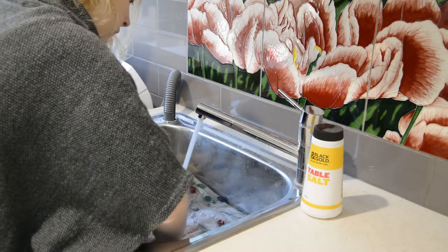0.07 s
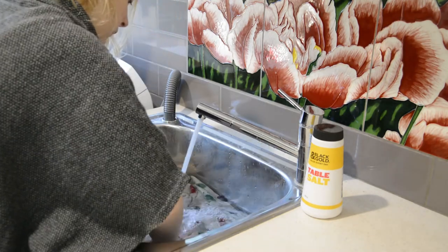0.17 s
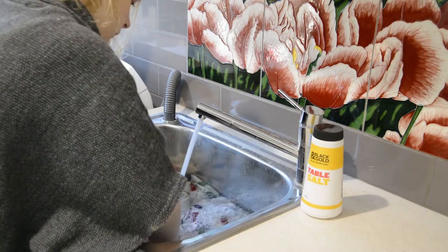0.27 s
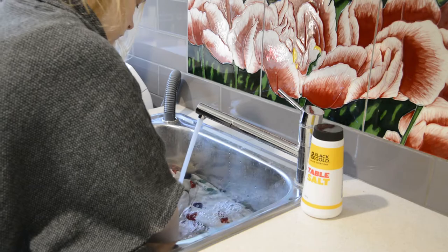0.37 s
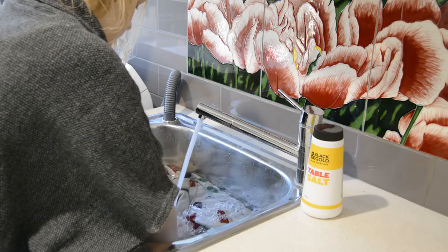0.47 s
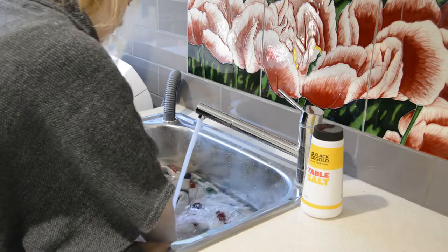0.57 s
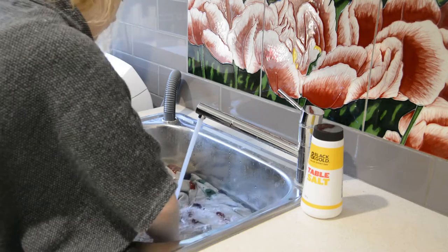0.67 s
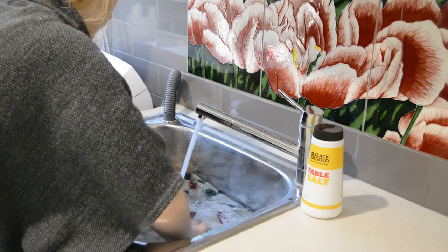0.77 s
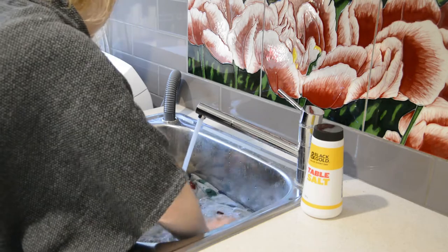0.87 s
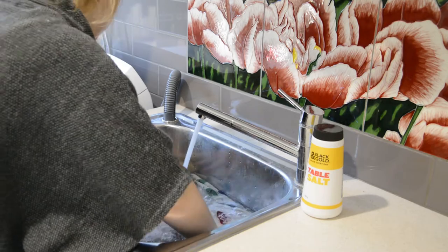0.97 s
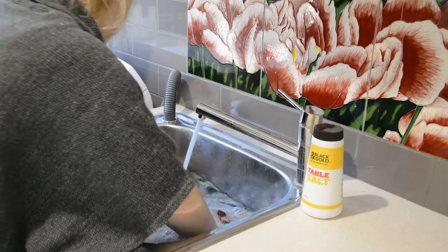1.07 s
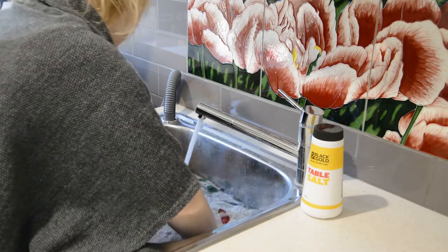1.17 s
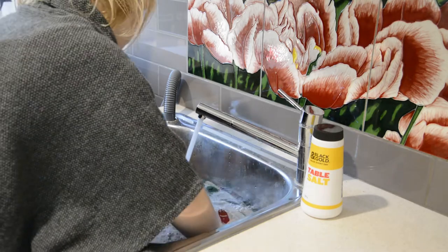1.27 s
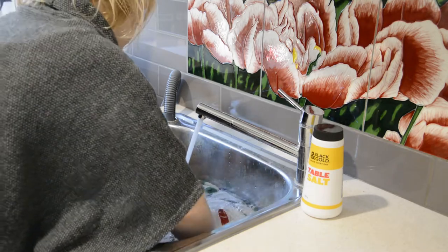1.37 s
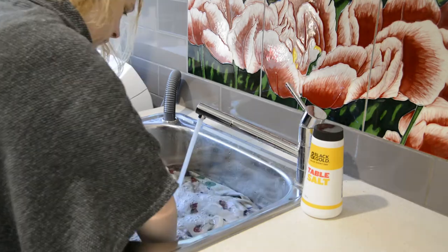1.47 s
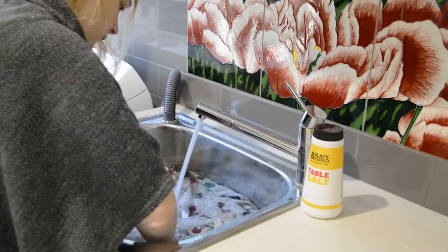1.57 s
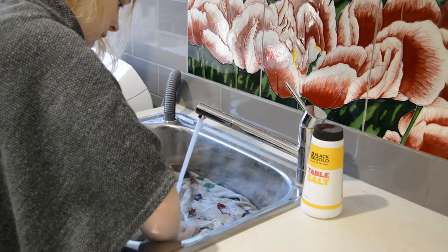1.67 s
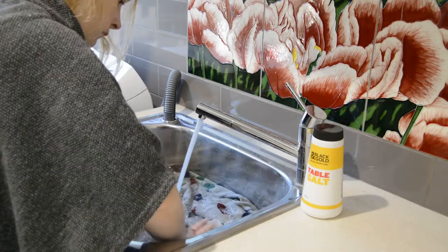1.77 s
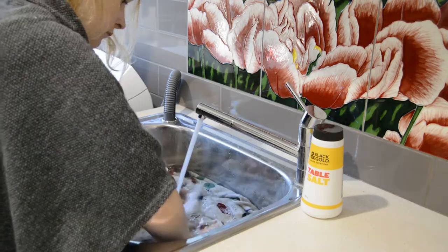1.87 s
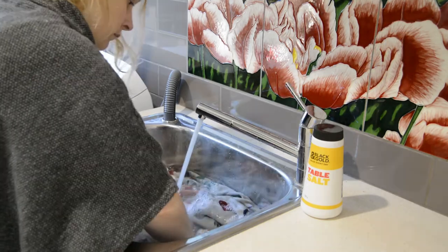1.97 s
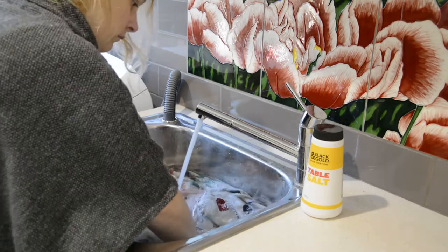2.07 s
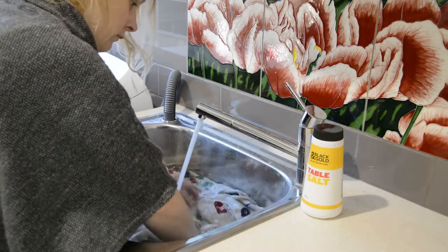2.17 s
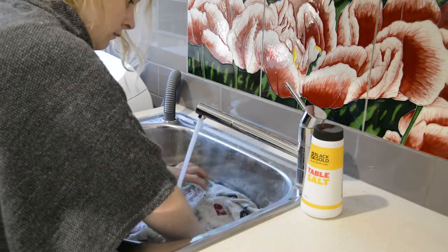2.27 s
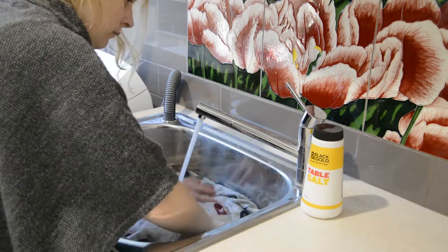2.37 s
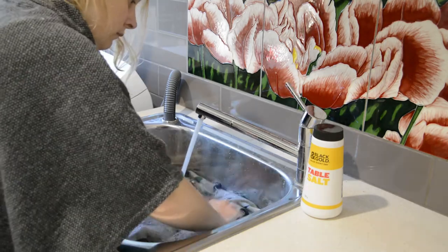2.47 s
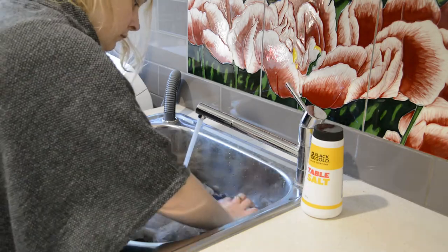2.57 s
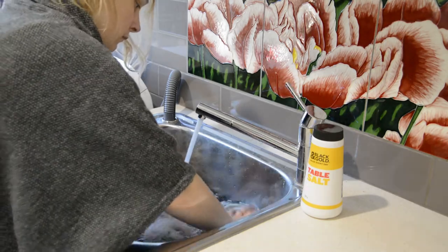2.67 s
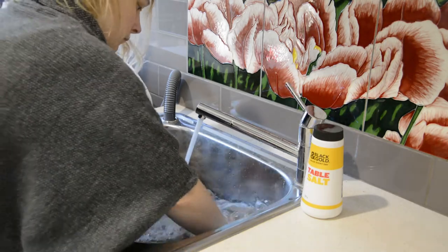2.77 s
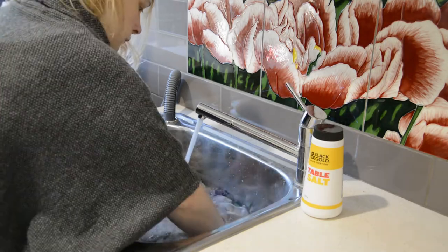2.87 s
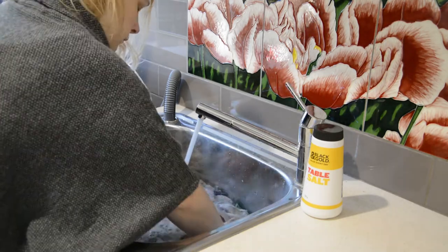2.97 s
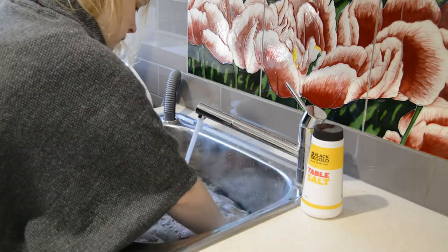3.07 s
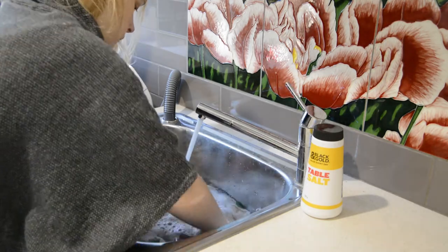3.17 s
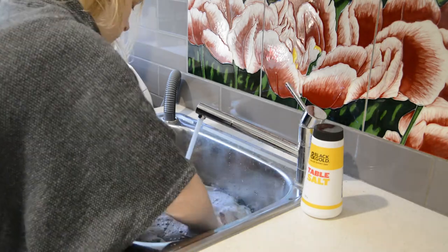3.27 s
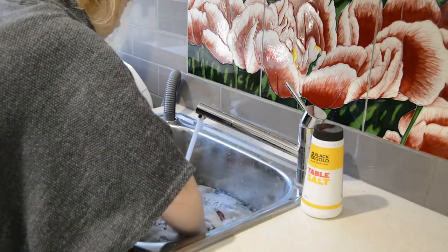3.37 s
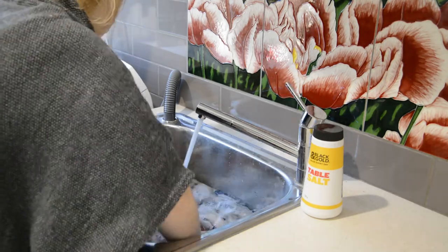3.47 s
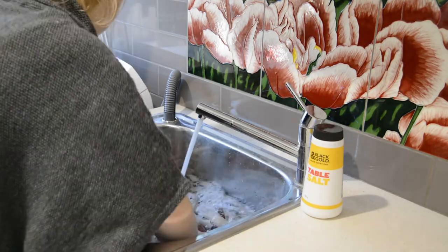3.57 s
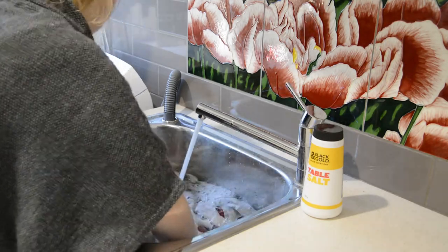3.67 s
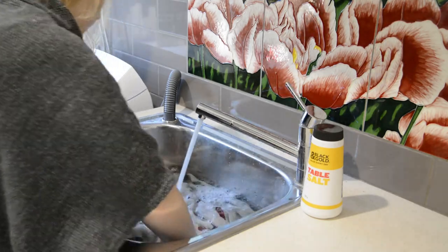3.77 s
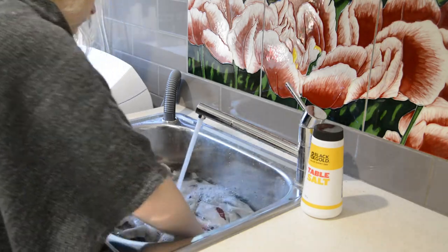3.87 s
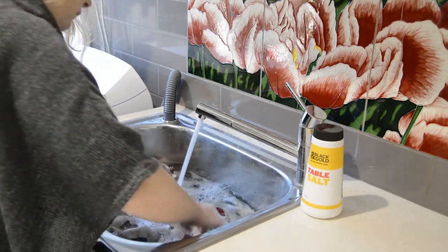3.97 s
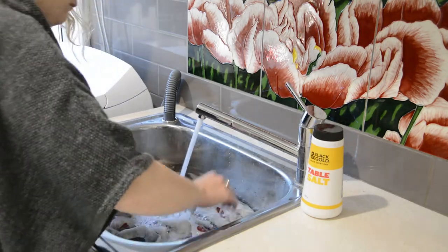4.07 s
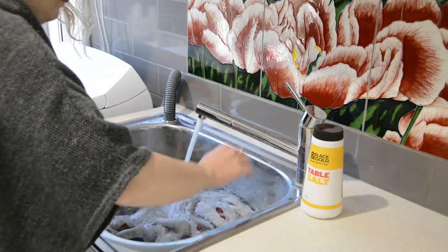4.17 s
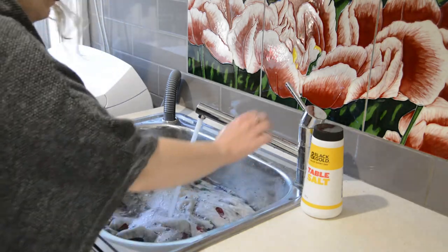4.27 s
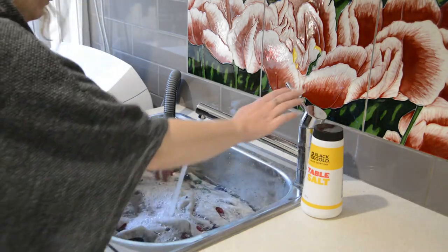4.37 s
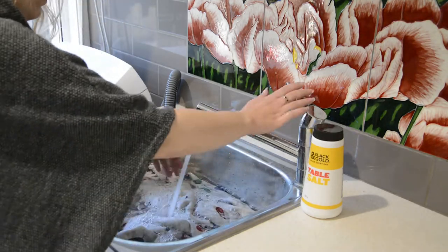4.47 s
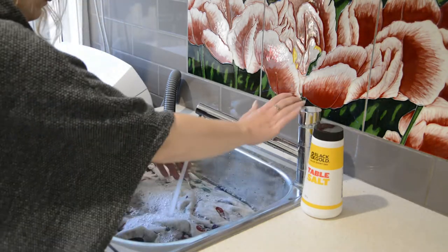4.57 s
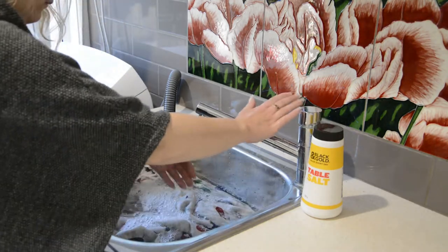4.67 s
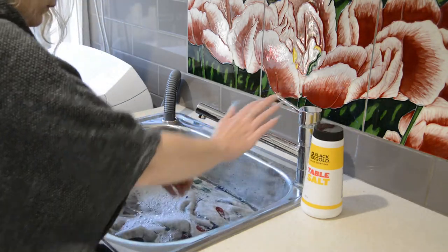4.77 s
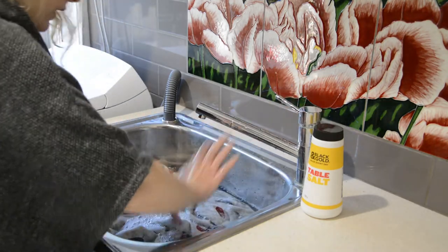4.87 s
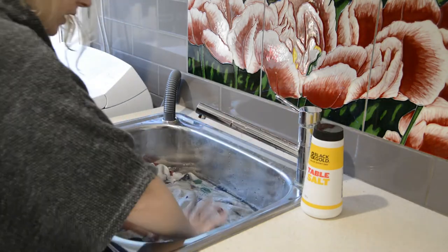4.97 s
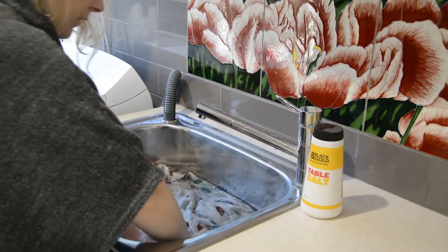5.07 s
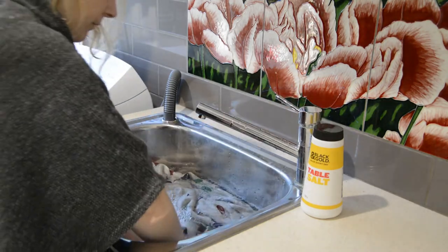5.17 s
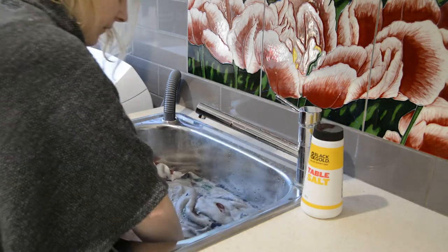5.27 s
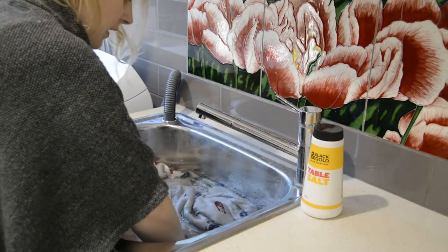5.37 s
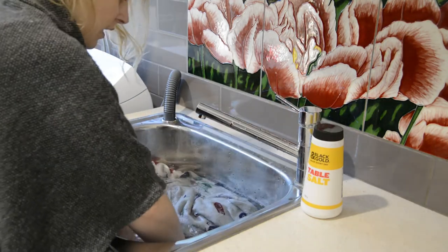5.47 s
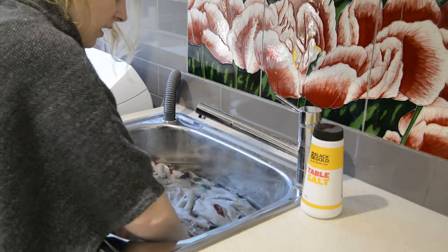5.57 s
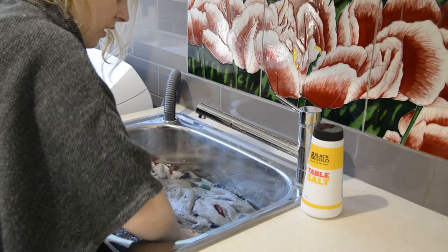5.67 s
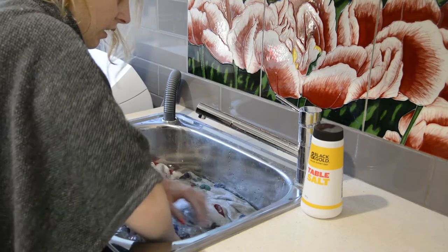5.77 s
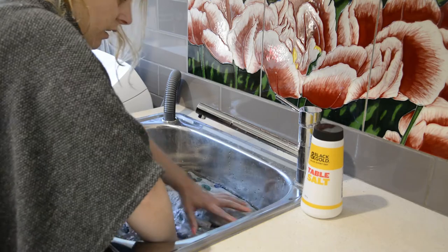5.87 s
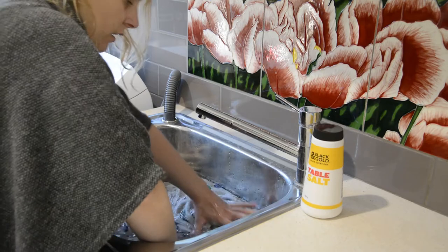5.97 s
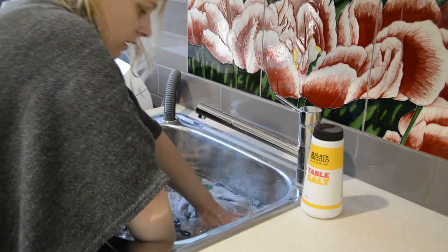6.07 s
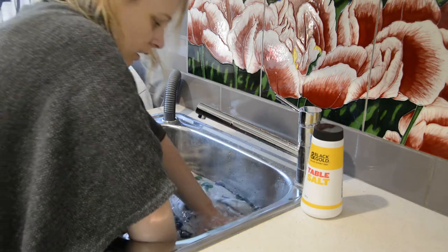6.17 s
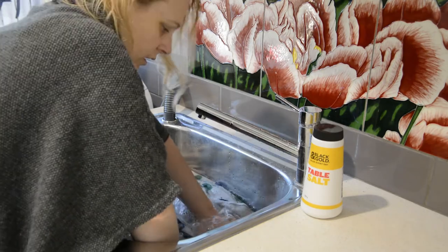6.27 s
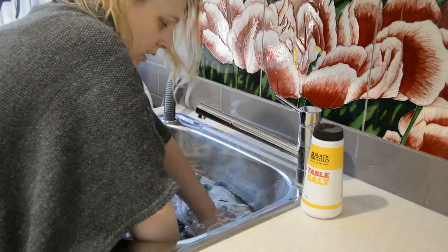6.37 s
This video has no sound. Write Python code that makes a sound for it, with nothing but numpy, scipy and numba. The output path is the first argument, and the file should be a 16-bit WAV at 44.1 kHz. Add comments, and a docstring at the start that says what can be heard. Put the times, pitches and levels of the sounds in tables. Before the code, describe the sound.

A bright, bubbling jet hits wet fabric in a metal basin with splashes; a dull shut-off, then small plops and squelches over faint fizzing foam.

```python
"""An aerated tap jet patters on cloth soaking in a steel sink: dense random clicks over a fine spray of noise.
It churns up ringing bubbles and drums the basin, as noise through resonances. Hands knead the cloth:
air gurgles out as strings of bubbles and water splashes in bursts of droplets. The lever is shut with a thud
and a jolt of low modes in the pipe; the kneading goes on over fizzing foam, in a small tiled kitchen."""
import sys
import numpy as np
from scipy import signal
from scipy.fft import rfft, irfft
from scipy.io import wavfile
from scipy.ndimage import uniform_filter1d
from numba import njit

SR = 44100
rng = np.random.default_rng(int(sys.argv[2]) if len(sys.argv) > 2 else 0)


def generate_wav(sig):
    """Save sig (samples, or channels by samples) to the path in sys.argv[1] as 16-bit PCM at SR."""
    pcm = np.round(np.clip(np.atleast_2d(sig).T, -1, 1) * 32767).astype(np.int16)
    wavfile.write(sys.argv[1], SR, pcm)


N = 284004
T = np.arange(N) / SR
# frequencies of a transform padded to twice the length
HZ = np.maximum(np.arange(N + 1) * SR / (2 * N), 1)


def undb(db):
    """Logarithmic level: decibels become an amplitude gain."""
    return 10 ** (np.asarray(db) / 20)


def unit(x):
    """Normalization by mean power: scale to rms 1."""
    return x / np.sqrt(np.mean(x ** 2))


def curve(rows):
    """Linear interpolation of (seconds, value) rows at every sample."""
    return np.interp(T, *np.transpose(rows))


def filtered(x, response):
    """Linear filtering: the spectrum is multiplied by a frequency response."""
    return irfft(rfft(x, 2 * N) * response)[..., :N]


def colour(points):
    """Spectral envelope: a response through (Hz, dB) points, straight over log frequency."""
    hz, db = np.transpose(points)
    return undb(np.interp(np.log(HZ), np.log(hz), db))


def resonances(modes):
    """Modal superposition: (Hz, width Hz, dB) resonators side by side."""
    return sum(undb(db) / (1 + 1j * (HZ ** 2 - hz ** 2) / (HZ * width)) for hz, width, db in modes)


def walk(rate):
    """Slow random modulation: levels drawn `rate` times a second and slewed, with a spread of about 0.84."""
    hold = int(SR / rate)
    steps = np.repeat(rng.standard_normal(N // hold + 1), hold)
    return 1.03 * uniform_filter1d(steps, hold)[:N]


def patter(rate, spread_db):
    """Random impulses: very many small droplet clicks and a few big ones, up to a largest drop."""
    size = undb(spread_db * np.minimum(rng.exponential(size=N), 4.7))
    struck = rng.random(N) < rate / SR
    return unit(struck * rng.choice([-1, 1], N) * size)


@njit
def bubbles(start, hz, ring_s, size, glide):
    """Bubble resonance: each swells within a cycle, decays 60 dB in ring_s and rises by the share glide."""
    out = np.zeros(N)
    for k in range(len(start)):
        first, life = int(start[k] * SR), int(ring_s[k] * SR) + 1
        turn = 2 * np.pi * hz[k] / SR
        phasor = size[k] + 0j
        step = np.exp(1j * turn - 6.9 / life)
        bend = np.exp(1j * turn * glide / life)
        for i in range(max(first, 0), min(first + life, N)):
            phasor *= step
            step *= bend
            out[i] += phasor.imag * min((i - first) * hz[k] / SR, 1.)
    return out


def burst(s, rise, fall):
    """Transient envelope: a rounded swell up to time s, then an exponential fall."""
    return np.exp(-np.minimum(np.where(T < s, ((T - s) / rise) ** 2, (T - s) / fall), 20))


# Each row: frequency in Hz, spectral level in dB per Hz, of the faint noise of each microphone.
HISS_SPECTRUM = [(50, -17), (200, -11), (600, 7.5), (1500, -4), (4000, 2), (16000, -10)]


def hiss():
    """Stationary noise: the faint, coloured hiss of one microphone."""
    return unit(filtered(rng.standard_normal(N), colour(HISS_SPECTRUM))) * undb(-60.5)


def kitchen(x, t60_s, wet_db, count):
    """Reverberation: tiles and worktop return dense tails, whose paths shift as the body moves over the sink."""
    t = T[:SR // 2]
    walls = filtered(x, colour([(200, 2.5), (900, 2.5), (4000, -1), (8000, 1.5), (15000, 1.0)]))
    shares = np.array([walk(3.5) for _ in range(count)])
    shares /= np.sqrt(np.sum(shares ** 2, axis=0))
    echo = 0
    for share in shares:
        # no reflection in the first 2 ms
        tail = rng.standard_normal(len(t)) * undb(-60 * t / t60_s) * (t > .002)
        echo = echo + signal.fftconvolve(walls * share, tail / np.sqrt(np.sum(tail ** 2)))[:N]
    return (x + undb(wet_db) * echo) / np.sqrt(1 + undb(2 * wet_db))


# Quiet kitchen with foam fizzing in the sink. Each row: frequency in Hz, spectral level in dB per Hz.
FOAM_SPECTRUM = [(30, -15), (60, -3), (85, -8), (112, 1.5), (160, -4), (300, 3), (750, 4.5), (1200, 5),
                 (1550, 4.5), (2050, 7), (2500, 1.5), (3000, 4.5), (4200, 3), (5100, 1.5), (6200, -1),
                 (7500, -0.5), (11000, -4.5), (16000, -3.5)]
# The fizzing foam settles once the hands rest. Each row: time in seconds, level in dB.
FOAM_LEVEL = [(4.8, -51.5), (5.25, -50.5), (5.6, -52.5), (5.95, -49.5), (6.2, -51), (6.4, -52.5)]
# Water seeping past the plug sings faintly.
# Each row: frequency in Hz, width in Hz of each of two resonators in series, gain in dB of each.
SEEP_RESONATORS = [(730, 72, -3), (2050, 300, -1), (3980, 160, -9)]
SEEP_DB = -60.5


def foam():
    """Random bursting: tiny bubbles click over the hush of the kitchen, and seeping water excites narrow bands."""
    fizz = rng.standard_normal(N) + undb(-1.5) * patter(rate=1100, spread_db=1.5)
    fizz = unit(filtered(fizz, colour(FOAM_SPECTRUM))) * undb(curve(FOAM_LEVEL) + 0.53 * walk(14))
    bands = sum(resonances([mode]) ** 2 for mode in SEEP_RESONATORS)
    seep = unit(filtered(rng.standard_normal(N), bands))
    return fizz + undb(SEEP_DB) * seep


# Modes of the pipe and the worktop. Each row: frequency in Hz, width in Hz, gain in dB.
PIPE_MODES = [(64.5, 20, -2), (118, 38, -2), (180, 48, -2), (299, 35, -7.5), (474, 690, -15),
              (710, 75, -16)]
# Dull thuds, of the lever and the closing valve, then of hands on the sink.
# Each row: peak time in seconds, level in dB, fall to 1/e in seconds.
THUD_BLOWS = [(4.55, -57, 0.033), (4.637, -37, 0.019), (4.673, -37.5, 0.034), (4.79, -48.5, 0.21),
              (5.08, -49.5, 0.065), (5.18, -57, 0.15), (5.495, -53, 0.016)]


def thuds():
    """Forced vibration: padded blows shake the modes of the pipe and the worktop."""
    tilt = colour([(25, -12), (50, -17.0), (800, 5), (2500, 7.0)])
    rumble = filtered(rng.standard_normal(N), resonances(PIPE_MODES) * tilt)
    # the blow alone sets the strength of the shaking
    rumble /= np.sqrt(uniform_filter1d(rumble ** 2, size=2500))
    return rumble * sum(undb(db) * burst(s, 0.033, fall) for s, db, fall in THUD_BLOWS)


# The lever meets its stop and the halted water jolts the plumbing; tap, pipe and sink ring in turn.
# Each row: start in seconds, peak level in dB, frequency in Hz, ring to -60 dB in seconds.
JOLT_MODES = [(4.627, -36, 650, 0.13), (4.626, -35.5, 176, 0.13), (4.643, -36.5, 117, 0.34),
              (4.645, -46, 63, .36), (4.66, -38, 318, 0.22)]


def jolt():
    """Free decay: shutting the valve sets off a few low modes; each swells within a cycle and rings out."""
    out = np.zeros(N)
    for s, db, hz, ring_s in JOLT_MODES:
        age = np.clip(T - s, 0, 2 * ring_s)
        swell = np.minimum(age * hz, 1)
        decay = np.exp(-np.log(1000) * age / ring_s)
        out += undb(db) * swell * decay * np.sin(2 * np.pi * hz * age)
    return out


# Water thrown up, or pressed and sucked through the cloth. Each row: peak time in seconds, level in dB,
# rise from 1/e in seconds, fall to 1/e in seconds, centre frequency in Hz.
SPLASH_BURSTS = [(.19, -29, 0.051, 0.049, 8040), (.3, -27.5, 0.063, 0.12, 7400),
                 (.99, -45, 0.023, 0.023, 560), (1.51, -44, .025, 0.071, 560),
                 (2.06, -26.5, 0.041, .04, 6940), (2.35, -35, 0.042, .1, 7000),
                 (2.5, -31.5, 0.067, .08, 2000), (2.662, -33, .008, .022, 2400),
                 (2.78, -24, 0.019, 0.032, 4300), (4.79, -52.5, .06, 0.073, 1300),
                 (4.98, -49, 0.048, 0.099, 7500), (5.08, -36.5, 0.041, 0.057, 2470),
                 (5.119, -36, .004, 0.01, 11000), (5.15, -36, 0.02, 0.027, 8000),
                 (5.186, -38.5, 0.005, 0.0067, 8040), (5.367, -45, .016, 0.03, 6600),
                 (5.467, -48, 0.029, .035, 4870), (5.536, -50, 0.003, 0.03, 2200),
                 (5.661, -45, .003, .02, 4200), (5.72, -44.5, 0.029, 0.079, 3300),
                 (5.785, -42, .018, 0.041, 6260), (5.793, -34, 0.0058, 0.0078, 12000),
                 (5.84, -50, 0.026, .09, 10900), (5.796, -35, 0.0045, 0.063, 2300),
                 (5.935, -43.5, 0.037, 0.082, 3200), (6.005, -46, 0.027, .03, 12500),
                 (6.05, -46, 0.035, 0.034, 1105), (6.059, -31.5, 0.026, 0.032, 3700),
                 (6.064, -38.5, 0.018, 0.024, 10800), (6.17, -56, .08, 0.12, 3300),
                 (6.44, -45, 0.0075, .008, 2330)]


def splashes(count=7000):
    """Band-limited bursts: ticking droplets and tiny ringing bubbles, each splash about its own centre."""
    when, pitch, size = rng.random((count, 3)).T
    pitch_hz = 900 * 14 ** pitch
    strength = undb(-3.5 * np.log(size + 0.043)) * pitch_hz
    fizz = bubbles(when * N / SR, pitch_hz, 20 / pitch_hz, strength, 0.11)
    drops = patter(rate=3700, spread_db=1.0) + undb(-7.5) * unit(fizz)
    # unpadded transform: every second frequency
    hz_grid = HZ[::2]
    spectrum = rfft(drops) * colour([(150, -26), (700, 10.0), (16000, -2.0)])[::2]
    out = np.zeros(N)
    for s, db, rise, fall, hz in SPLASH_BURSTS:
        band = 1 / (1 + 1j * (hz_grid / hz - hz / hz_grid) / 1.74) ** 2
        out += undb(db) * burst(s, rise, fall) * unit(irfft(spectrum * band))
    return out


# bubbles of one pocket climb in pitch as it empties
CLIMB_OCTAVES_PER_S = 4.14
# a bubble rings for a set number of cycles, but no longer than the cloth lets it, before random scatter
RING_CYCLES, RING_MAX_S = 73, 0.098


def gurgle(s, db, hz, length, scatter, count=20):
    """Bubble formation: a pocket of air breaks into a string of bubbles, the later ones higher and weaker."""
    when = (np.arange(count) + rng.random(count)) / count
    pitch, size, life = rng.standard_normal((3, count))
    octaves = scatter * pitch + CLIMB_OCTAVES_PER_S * length * (when - .5)
    ring_s = min(RING_CYCLES / hz, RING_MAX_S) * np.exp(0.37 * life)
    strength = undb(1.1 * size - 2.0 * np.abs(pitch) - 4.6 * when)
    string = bubbles(s + length * (when - when[0]), hz * 2 ** octaves, ring_s, strength, 0.1)
    return undb(db) * string / np.sqrt(np.sum(string ** 2) / ((length + 0.016) * SR))


# Pockets of air squeezed out of the cloth. Each row: start in seconds, level in dB, bubble pitch in Hz,
# length in seconds, scatter of pitch in octaves.
AIR_POCKETS = [(0.022, -40, 1400, 0.089, 0.13), (0.657, -42.5, 885, 0.053, 0.14),
               (0.713, -45.5, 1016, 0.047, 0.12), (0.681, -48.5, 227, .08, 0.11),
               (0.768, -34.5, 1159, 0.041, 0.11), (0.805, -37, 1380, 0.039, 0.092),
               (0.823, -38.5, 1960, 0.033, 0.051), (0.933, -45.5, 276, 0.059, 0.12),
               (0.98, -36, 1600, 0.029, 0.15), (1.07, -35, 3640, .035, 0.19),
               (1.121, -46, 250, .038, 0.097), (1.283, -46.5, 263, 0.062, 0.14),
               (1.423, -36, 1470, 0.016, 0.47), (1.69, -41, 916, 0.045, 0.085),
               (1.738, -37, 1133, 0.05, 0.12), (1.771, -39, 1322, 0.03, 0.14),
               (1.897, -36, 4100, 0.035, 0.21), (2.122, -32.5, 2010, .03, 0.26),
               (2.158, -50, 240, .05, 0.14), (2.359, -35.5, 962, .07, 0.19), (2.433, -36, 1510, .028, 0.18),
               (2.451, -40, 924, .065, 0.17), (2.508, -37, 1714, 0.062, 0.28),
               (2.651, -31.5, 1960, .028, 0.3), (2.756, -40, 945, .02, .12),
               (3.666, -37.5, 2220, .07, 0.16), (4.96, -49.5, 3260, 0.037, 0.18),
               (4.998, -48, 1920, 0.048, 0.2), (5.04, -48, 950, .06, .24), (5.059, -40.5, 1754, .045, 0.2),
               (5.166, -48, 2750, 0.023, .12), (5.228, -52, 2080, .03, 0.11),
               (5.294, -49, 1110, 0.039, 0.15), (5.345, -37.5, 1298, .014, 0.37),
               (5.367, -43, 1650, 0.017, 0.25), (5.391, -48, 1020, .014, 0.137),
               (5.407, -52, 1580, 0.036, 0.4), (5.459, -46.5, 2390, 0.025, .24),
               (5.465, -50.5, 5100, .025, .12), (5.524, -48.5, 3870, 0.044, 0.14),
               (5.534, -46.5, 1413, .015, 0.21), (5.657, -41.5, 3590, 0.022, 0.16),
               (5.66, -50, 1390, .012, 0.15), (5.703, -41, 1530, 0.03, .2), (5.729, -46, 3190, .02, 0.14),
               (5.769, -44, 1400, .01, 0.32), (5.79, -40.5, 2500, .018, 0.059),
               (5.789, -37.5, 1020, .02, 0.15), (5.792, -45.5, 4750, 0.027, 0.11),
               (5.826, -44, 1450, .04, .34), (5.859, -50, 1100, .03, 0.3),
               (5.904, -41.5, 1780, 0.053, 0.22), (5.982, -48, 1270, 0.024, 0.38)]
# small pockets of air that the jet frees by chance
STRAY_DB, STRAY_LENGTH_S = -39, .04
STRAY_LOW_HZ, STRAY_OCTAVES, STRAY_SCATTER_OCTAVES = 1400, 1.6, .2


def gurgles(count=12):
    """Displacement of air by water: hands squeeze out big pockets; the running jet frees small ones at random."""
    pockets = list(AIR_POCKETS)
    for when, pitch in rng.random((count, 2)):
        hz = STRAY_LOW_HZ * 2 ** (STRAY_OCTAVES * pitch)
        pockets.append((when * SHUT_S, STRAY_DB, hz, STRAY_LENGTH_S, STRAY_SCATTER_OCTAVES))
    return filtered(sum(gurgle(*row) for row in pockets), colour([(60, -31), (190, -0.5)]))


# Lone large bubbles that ring on in calm water.
# Each row: start in seconds, peak level in dB, starting pitch in Hz, ring to -60 dB in seconds.
LONE_BUBBLES = [(4.849, -42, 196, .13), (5.037, -33, 1800, .11), (5.06, -30, 1825, .09),
                (5.038, -40, 817, .08), (5.064, -41, 775, .09), (5.118, -39, 790, .1),
                (5.142, -38, 766, 0.11), (5.346, -31, 940, 0.028), (5.35, -30, 1470, .035),
                (5.361, -31, 1430, .02), (5.366, -30, 1036, 0.075), (5.378, -25.5, 1074, 0.038),
                (5.388, -38, 765, .08), (5.539, -40, 1355, .08), (5.558, -38, 1290, 0.069),
                (5.598, -48, 1300, .06), (5.706, -34, 1410, .03), (5.717, -35, 1530, .04),
                (5.79, -26, 866, .08), (5.793, -30, 1380, .04), (5.804, -28, 926, 0.065),
                (5.813, -31, 826, 0.09), (5.905, -33, 1520, .03), (5.925, -36, 1610, .05)]


def plops():
    """Volume resonance of single large bubbles: each is one clear, slightly rising note."""
    s, db, hz, ring_s = np.array(LONE_BUBBLES, float).T.copy()
    return bubbles(s, hz, ring_s, undb(db), 0.04)


# the valve closes; the water left in the spout trickles on for a moment
SHUT_S, CLOSE_DB_PER_S = 4.608, 320
TRICKLE_DB, TRICKLE_S, DRAIN_DB_PER_S = -13.5, 0.12, 232
# the jet first glances off a fold, then strikes the cloth squarely and patters louder
GLANCING_DB, SQUARE_S = -2.5, 1.472


def flow():
    """Throttling: the share of the full flow that passes the closing valve."""
    return undb(-CLOSE_DB_PER_S * np.maximum(T - SHUT_S, 0))


def landing():
    """Impact strength: the jet lands glancing at first, and at last trickles from the emptying spout."""
    trickle = undb(TRICKLE_DB - DRAIN_DB_PER_S * np.maximum(T - SHUT_S - TRICKLE_S, 0))
    return np.maximum(flow(), trickle) * undb(GLANCING_DB * (T < SQUARE_S))


# Singing bands of the aerator.
# Each row: frequency in Hz, width in Hz of each of two resonators in series, gain in dB of each.
AERATOR_RESONATORS = [(3100, 280, 2.5), (4960, 420, -2)]
# the aerator sings faintly, most while the jet runs undisturbed
AERATOR_DB, AERATOR_SWELL_DB, AERATOR_PEAK_S, AERATOR_SWELL_S = -44, 7, 3.18, 0.32


def aerator():
    """Flow-excited resonance: water forced through the mesh in the spout sings in two narrow bands."""
    bands = sum(resonances([mode]) ** 2 for mode in AERATOR_RESONATORS)
    song = unit(filtered(rng.standard_normal(N), bands))
    swell = AERATOR_SWELL_DB * np.exp(-((T - AERATOR_PEAK_S) / AERATOR_SWELL_S) ** 2)
    return song * undb(AERATOR_DB + swell + 1.2 * walk(8.6)) * flow()


def drum(modes, strength):
    """Random excitation of modes: the jet drums through shifting cloth, now one mode more, now another."""
    out = np.zeros(N)
    for hz, width, db in modes:
        ringing = filtered(rng.standard_normal(N), resonances([(hz, width, 0)]) ** 2)
        out += undb(db + 2.7 * walk(14)) * unit(ringing)
    # the modes share one push between them
    out = out / np.sqrt(uniform_filter1d(out ** 2, size=4000))
    return out * strength * flow()


# Low modes of the sink bottom, then higher ones, which ring where the cloth lies thin.
# Each row: frequency in Hz, width in Hz of each of two resonators in series, level in dB among the modes.
BOTTOM_LOW_MODES = [(233.6, 30, -7.5), (272, 23, -1.5), (309, 23.6, 7)]
BOTTOM_HIGH_MODES = [(370, 60, -6.5), (440.7, 22, -1.5), (575, 120, 0.5), (740, 140, 2)]
# How hard the jet drums the low and the high modes as the cloth is moved over the bottom.
# Each row: time in seconds, level in dB.
LOW_DRUMMING = [(0, -62.5), (.33, -69), (.5, -59), (1.3, -57.5), (1.6, -50), (1.93, -51), (2.05, -57),
                (2.2, -54.5), (2.55, -54), (2.75, -49), (3.0, -54.5), (3.13, -52), (3.3, -52), (3.5, -54.5),
                (4.6, -54.5)]
HIGH_DRUMMING = [(0, -69), (1.35, -65), (1.55, -50), (1.9, -52), (2.1, -56), (2.5, -59), (3.2, -56),
                 (3.5, -49), (3.9, -46.5), (4.6, -51.5)]
# The sink bottom booms briefly when a fold gives way under the jet.
# Each row: peak time in seconds, level in dB, time from the peak to 1/e in seconds.
FOLD_BOOMS = [(.5, -52, .05), (0.996, -46.5, 0.021), (1.145, -50, .025), (1.354, -52, .03), (1.7, -41, .03),
              (1.802, -47, .025), (2.227, -50, 0.045), (2.397, -45, .025), (2.685, -41, 0.034),
              (2.815, -45, .022), (2.912, -40, 0.027), (3.03, -46, 0.029), (3.28, -52, .03),
              (3.874, -48.5, 0.023), (4.094, -48, .025)]
DRUM_THROB_DB, DRUM_THROBS_PER_S = 3, 13


def sink_bottom():
    """Plate vibration: low modes throb and boom in short swells; high ones come up as cloth is pushed aside."""
    booms = sum(undb(db) * np.exp(-((T - s) / length) ** 2) for s, db, length in FOLD_BOOMS)
    low = undb(curve(LOW_DRUMMING) + DRUM_THROB_DB * walk(DRUM_THROBS_PER_S))
    high = undb(curve(HIGH_DRUMMING) + 2.7 * walk(15))
    return drum(BOTTOM_LOW_MODES, np.hypot(low, booms)) + drum(BOTTOM_HIGH_MODES, high)


# Shape of the bubbling pool. Each row: frequency in Hz, filter gain in dB.
CHURN_FILTER = [(400, -21), (700, -10), (950, 0), (1250, -5), (1600, -0.5), (2400, -1.5), (3100, 0.5),
                (4000, -9), (7000, 1), (14000, -37)]
# Air churned into the pool under the jet, least when the cloth covers it.
# Each row: time in seconds, level in dB under the square, full jet.
CHURN_LEVEL = [(0, -34.5), (1.3, -36.5), (1.6, -34.5), (2.5, -34.5), (3.1, -40.5), (3.45, -34),
               (3.9, -35.5), (4.6, -39)]
CHURN_SWELL_DB, CHURN_SWELLS_PER_S = 1.5, 9


def churn(count=9000):
    """Air entrainment: the jet drags air under, and a cloud of small bubbles rings in the pool."""
    when, pitch, life, size = rng.random((count, 4)).T
    hz = 700 * 8 ** pitch
    ring_s = 22 * (.5 + life) / hz
    strength = undb(-3.0 * np.log(size + 0.019)) * hz
    cloud = unit(filtered(bubbles(when * N / SR, hz, ring_s, strength, 0.13), colour(CHURN_FILTER)))
    return cloud * undb(curve(CHURN_LEVEL) + CHURN_SWELL_DB * walk(CHURN_SWELLS_PER_S)) * landing()


# Spectrum of the jet on the cloth. Each row: frequency in Hz, spectral level in dB per Hz.
JET_SPECTRUM = [(100, -42), (200, -17.5), (400, -14), (650, -9.5), (900, -11.5), (1300, -8), (2000, 0),
                (3000, -2), (3900, -1.5), (5200, -3.5), (7500, -4), (10000, -6.5), (12500, -7),
                (16000, -6.5)]
JET_DB = -27  # when it strikes squarely at full flow


def jet():
    """Impact noise: the aerated jet shatters on the cloth into dense clicks over a fine spray."""
    drops = patter(rate=6500, spread_db=1.5) + undb(0.5) * rng.standard_normal(N)
    return unit(filtered(drops, colour(JET_SPECTRUM))) * undb(JET_DB + 0.73 * walk(29.95)) * landing()


# Rings of the steel basin, heard in all the water.
# Each row: frequency in Hz, width in Hz, level in dB over the direct sound.
BASIN_MODES = [(444, 10, -5.5), (753, 16, -8.5), (853, 16, -5.5), (944, 11, -4), (1020, 15, -0.5),
               (1260, 10.5, -3), (1440, 42, -3), (1500, 20, -4.5), (1724, 9, -12), (2158, 14, -35),
               (2390, 33, -2), (2585, 39, -6), (2850, 51, -8), (3020, 60, -16), (3535, 30, -4),
               (5030, 98, -9)]
# Left and right differ only in the treble. Each row: frequency in Hz, gain in dB of the side signal.
STEREO_WIDTH = [(100, -50), (1000, -108), (2000, -29), (4000, -15), (8000, -9.5), (12000, -5.5),
                (15500, -2.5)]


def scene():
    """Superposition: water rings in the basin and the room, and other reflections reach each side."""
    water = jet() + churn() + gurgles() + plops() + splashes() + foam()
    water = filtered(water, (1 + resonances(BASIN_MODES)) * undb(-0.69))
    dry = water + aerator() + sink_bottom() + thuds() + jolt()
    mid = kitchen(dry, t60_s=0.28, wet_db=-6, count=6)
    # the side signal is turned by a quarter cycle
    side = filtered(kitchen(dry, t60_s=0.16, wet_db=23, count=2), 1j * colour(STEREO_WIDTH))
    return np.array([mid + side, mid - side])


TOP_HZ = 15850


def record(dry):
    """Band limiting: each microphone adds its own hiss, and a steep low-pass cuts the top."""
    low_pass = signal.ellip(12, .1, 85, TOP_HZ, fs=SR, output="sos")
    return signal.sosfilt(low_pass, dry + np.array([hiss(), hiss()]))


dry = scene()
out = record(dry)
generate_wav(out)
```